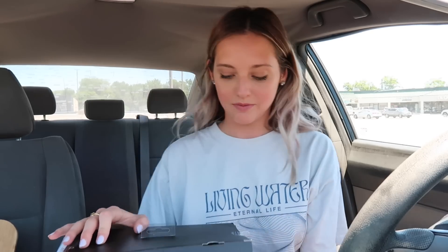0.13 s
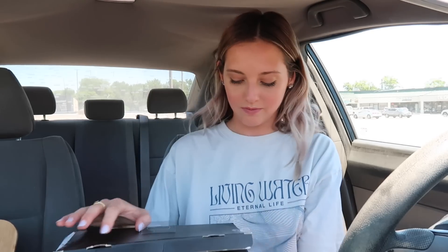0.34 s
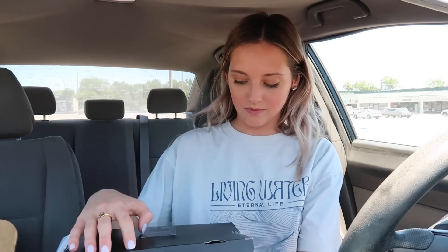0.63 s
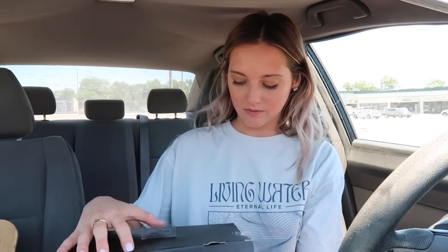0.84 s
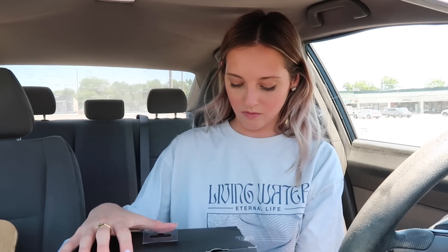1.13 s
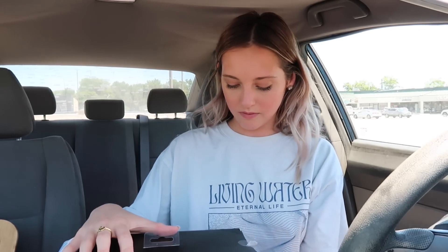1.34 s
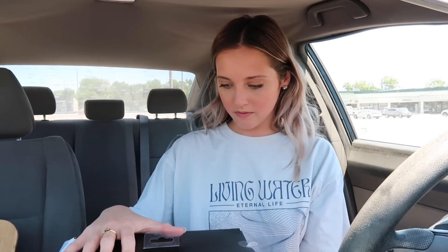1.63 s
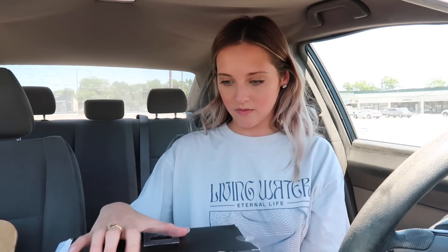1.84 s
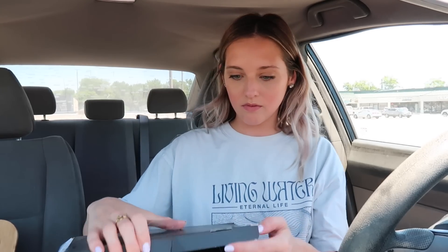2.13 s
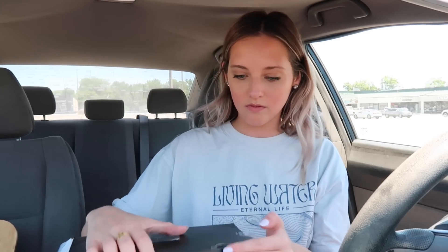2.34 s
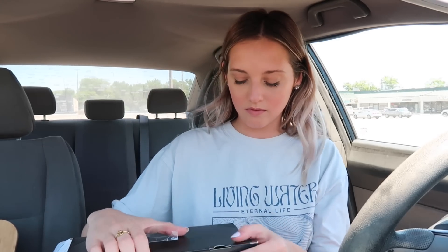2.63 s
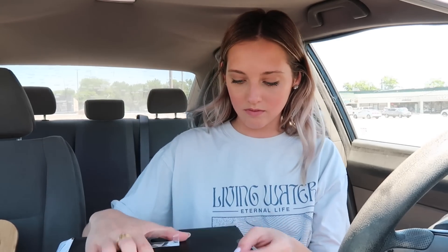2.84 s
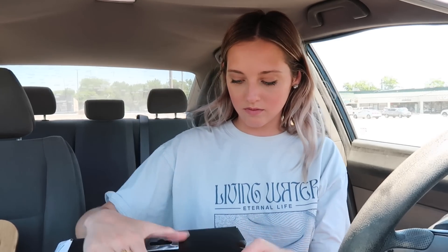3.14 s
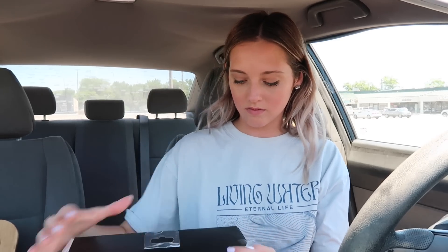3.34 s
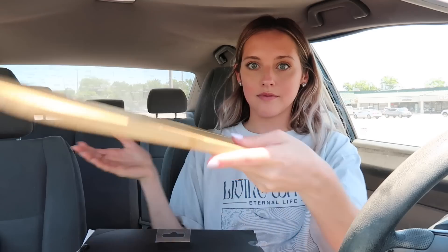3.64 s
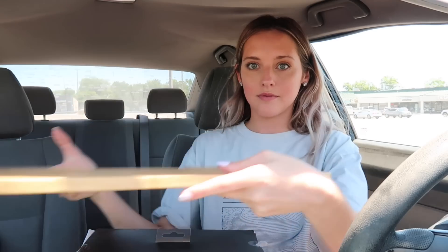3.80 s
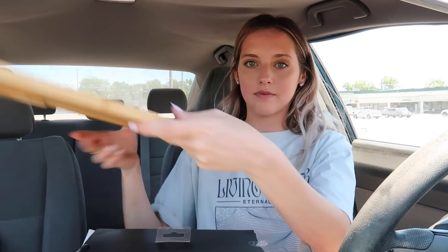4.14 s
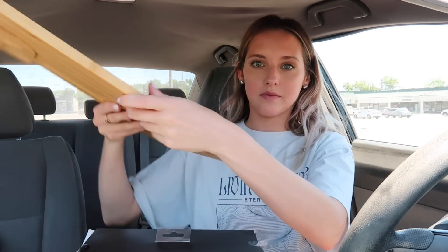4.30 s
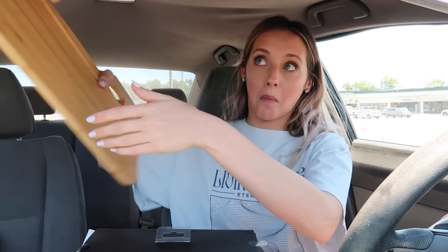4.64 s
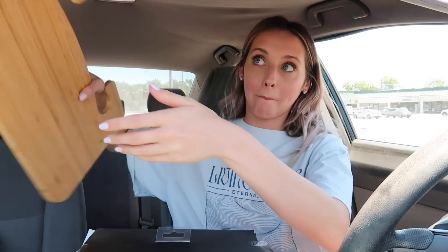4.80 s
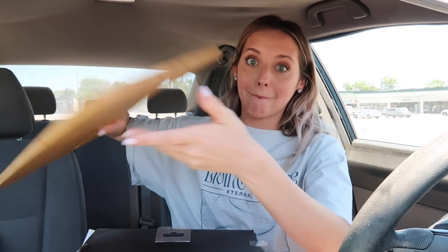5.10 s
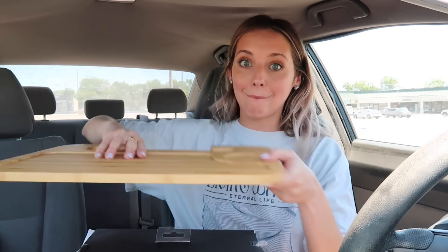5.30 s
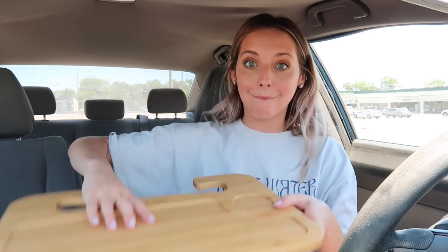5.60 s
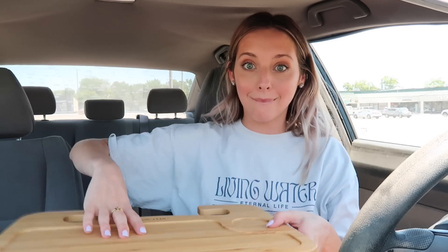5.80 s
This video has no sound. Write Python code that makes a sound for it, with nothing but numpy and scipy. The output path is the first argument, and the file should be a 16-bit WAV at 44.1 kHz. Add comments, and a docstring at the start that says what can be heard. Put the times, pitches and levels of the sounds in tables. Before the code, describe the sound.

A parked car's blower pushes steady, low-weighted air through the vents, with a soft idle hum and narrow booming resonances below 250 Hz, unchanged throughout. Fine cloth and card rustle hisses faintly on top. At about 0.8 s and again at 1.05 s, fingers tap and scuff a cardboard box in tight, dry clusters; a tiny squeak follows at 1.27 s. Softer scrapes come at 1.75 to 2.1 s. From 2.35 to 3.1 s handling is dense: gritty scuffs, nail ticks, short squeaks near 2.5 and 2.7 s, a hollow box tap at 2.87 s, a squeak at 3.08 s. Lighter scuffs occur at 3.2 to 3.5 s. Then it is mostly air, with faint brushes at 4.0 to 4.3 s and a light tick at 5.2 s. A wooden tray lands with the loudest, clustered knock at 5.68 s, and again more lightly at 5.88 s. Close, dry, nearly mono pickup.

```python
"""Handling a box and a tray in an idling car

Fingers scuff and tap a cardboard box (grainy noise bursts, blows into ringing modes) and small parts squeak.
A wooden tray knocks as it is turned and set down; cloth and card rustle as a fine treble hiss.
Behind them the blower pushes air through the vents, shaped noise that booms in narrow resonances.
A small two-port microphone: almost all is shared, the difference of the ports holds faint treble."""
import sys
import numpy as np
from scipy import signal
from scipy.fft import rfft, irfft, next_fast_len
from scipy.io import wavfile
from scipy.ndimage import uniform_filter1d

SR = 44100
rng = np.random.default_rng(int(sys.argv[2]) if len(sys.argv) > 2 else 0)


def unload_wav(signal):
    """Save mono or channel-first audio to the path in sys.argv[1] as 16-bit WAV at rate SR, clipped to [-1, 1]."""
    wavfile.write(
        sys.argv[1],
        SR,
        np.round(np.clip(np.atleast_2d(signal).T, -1, 1) * 32767).astype(np.int16),
    )


N = 262763
LEAD_S = 0.06  # room before the peak for a scuff or squeak to grow


def undb(db):
    """Decibels to an amplitude factor."""
    return 10 ** (np.asarray(db) / 20)


def unit(x):
    """Scale to an rms of 1."""
    return x / np.sqrt(np.mean(x ** 2))


def stepped(values, hold):
    """Hold each value for some samples and slew over half of that."""
    return uniform_filter1d(np.repeat(values, hold), hold // 2)


def walk(rate):
    """Random levels held 1 / rate s and slewed twice; spread near 1."""
    hold = int(SR / rate)
    steps = np.repeat(rng.standard_normal(N // hold + 1), hold)
    return 1.4 * uniform_filter1d(uniform_filter1d(steps, hold), hold)[:N]


def bin_hz(size):
    """Frequencies of the bins of a real transform."""
    return np.arange(size // 2 + 1) * SR / size


def shaped(spectrum, size):
    """Noise with the colour of (pitch_hz, level_db) points, joined over log frequency."""
    hz, db = np.transpose(spectrum)
    gain = undb(np.interp(np.log(bin_hz(size) + 1), np.log(hz), db, left=-99))
    return irfft(rfft(rng.standard_normal(size)) * gain, size)


def swell(t, rise, t60):
    """Exponential growth to a point at time zero, then an exponential fall."""
    return np.exp(np.minimum(t, 0) / rise) * undb(-60 * np.maximum(t, 0) / t60)


def add(out, s, x):
    """Mix a sound in at s seconds, cut at the end of the scene."""
    i = int(s * SR)
    out[..., i:i + x.shape[-1]] += x[..., :N - i]


# scuffs and taps of fingers, nails and edges: start_s (at the peak), level_db (shared rms at the peak),
# body_db (500 Hz re 2.8 kHz), bright_db (5.5 kHz re 2.8 kHz), t60_s
SCUFFS = [(0.783, -26.5, 3, -18, 0.09), (0.7906, -24.5, 3, -12.5, 0.051), (0.806, -26.5, 13, -20, 0.14),
          (1.035, -24, 7, -9, 0.038), (1.0445, -24, 11, -12, 0.022), (1.0572, -26.5, 3, -10.5, 0.072),
          (1.1078, -25, 18, -19, 0.08), (1.7294, -31.5, 8.5, -7.5, 0.092), (1.7537, -31, 14, -1, 0.072),
          (1.9152, -33, 2, -17, 0.16), (1.9396, -26, 4, -13, 0.063), (1.956, -26, -1, -19.5, 0.05),
          (2.089, -25, 0.5, -16, 0.073), (2.262, -38.5, -5, -1, 0.065), (2.3645, -32, -7, -5, 0.042),
          (2.371, -36, -7, -7, .08), (2.4006, -32, -5, -13, 0.1), (2.4244, -26.5, 11, -12, 0.11),
          (2.4868, -36, -6, -16, 0.12), (2.5084, -31, -3, -20, 0.092), (2.58, -41, 8, 1, .07),
          (2.6304, -34, -5, -13.5, 0.11), (2.6683, -45, 1, -20, .1), (2.6902, -33, 13, -6, 0.24),
          (2.7445, -23, 6, -9, 0.043), (2.753, -31, 10, -7, 0.1), (2.7853, -28, 2, -7, 0.068),
          (2.794, -29, 3, -10, 0.13), (2.847, -35, 10, 5, 0.07), (2.8683, -29, 0, -2, 0.02),
          (2.878, -29.5, 4, -18, 0.33), (2.9344, -30, 4, -17, 0.12), (2.9513, -22.5, 5, -16, 0.17),
          (2.9625, -23, 5.5, -1.5, 0.072), (2.9778, -28.5, 1, -15, 0.1), (3.0812, -24, 4, -16, 0.04),
          (3.094, -29, 21, 1, 0.047), (3.207, -33.5, -5, -20, 0.15), (3.3417, -32, 11, -14, 0.15),
          (3.353, -33, -2, -14, .12), (3.3635, -33, 0, -15, 0.11), (3.375, -32, -2, -13, .09),
          (3.463, -47.5, 5, 5, 0.22), (3.514, -33, 7, -10, .15), (3.5225, -30, 10, -8, 0.089),
          (3.529, -33, 13, -10, 0.087), (4.014, -40, 15, 1, 0.057), (4.1044, -30, 0.5, -18.5, 0.28),
          (4.2826, -36.5, 0, -10, 0.23), (5.2075, -32.5, -2, -3, 0.04), (5.223, -35, -4, -1, 0.075),
          (5.674, -17.5, -2, -14, 0.078), (5.6835, -21.5, 8, -14, 0.06), (5.693, -25, 3, -14, 0.11),
          (5.7714, -39, -12, -18, .08), (5.826, -41, -7, -2, 0.1), (5.875, -29, -8, -16, 0.082),
          (5.885, -29, 0, -20, 0.045), (5.896, -28, -2, -10, 0.07)]
# colour slopes in dB: 1.3 kHz re body_db; 4.3, 8, 11 and 15.5 kHz re bright_db
SCUFF_SLOPE_DB = (0.5, 5.5, -11.5, -19.5, -34.5)
# colour of the port difference: pitch_hz, level_db (relative, per Hz)
SCUFF_SIDE_TONE = [(1500, -21.5), (3500, -1), (6000, -2.5), (10000, -8.5), (14000, -9.5), (15600, -30)]
SCUFF_SIDE_DB, SCUFF_SIDE_SHARE = -10, 0.44  # port difference re shared; dB it gains per dB of brightness
SCUFF_RISE_SHARE = 0.057  # rise time re t60: short taps are also abrupt


def scuffs():
    """Gritty noise bursts swell and die in the padded cabin; bright ones split more between the ports."""
    out, size = np.zeros((2, N)), 8192
    t = np.arange(size) / SR - LEAD_S
    chest_db, bite_db, high_db, top_db, edge_db = SCUFF_SLOPE_DB
    for start_s, level_db, body_db, bright_db, t60_s in SCUFFS:
        # stick and slip: the burst is made of uneven grains about 1.5 ms long
        grain_db = 3.3 * rng.exponential(size=128).clip(0, 2.5)
        grit = stepped(undb(grain_db), 64)
        envelope = swell(t, SCUFF_RISE_SHARE * t60_s, t60_s) * unit(grit)
        tone = [(500, body_db), (1300, body_db + chest_db), (2800, 0.018),
                (4300, min(bright_db + bite_db, 0)), (5500, bright_db), (8000, bright_db + high_db),
                (11000, bright_db + top_db), (15500, bright_db + edge_db)]
        # each spot of the card favours other resonances, about 350 Hz apart
        ripple = stepped(undb(2.5 * rng.standard_normal(65)), 64)[:size // 2 + 1]
        shared = irfft(rfft(shaped(tone, size)) * ripple, size)
        side_db = SCUFF_SIDE_DB + SCUFF_SIDE_SHARE * bright_db
        burst = np.array([unit(shared), undb(side_db) * unit(shaped(SCUFF_SIDE_TONE, size))])
        add(out, start_s - LEAD_S, undb(level_db) * envelope * burst)
    return out


TILT_HZ = 1500  # a positive tilt lifts the modes above and lowers those below
FAVOUR_DB, FAVOUR_OCTAVES = 8.5, 0.21  # lift of the modes near the favoured pitch, and its reach
STRIKE_RISE_S = 0.00085  # near surfaces answer at once, so a blow builds up


def strikes(blows, modes):
    """A half-sine push into the modes of a struck thing; each blow lands elsewhere and weights them anew."""
    out, t = np.zeros(N), np.arange(6000) / SR
    hz, mode_db, t60_s = np.transpose(modes)[:, :, None]
    for start_s, drive_db, contact_s, tilt_db, favoured_hz in blows:
        spot_level, spot_pitch, spot_phase = rng.standard_normal((3, len(modes), 1))
        tilt = tilt_db * np.log2(hz / TILT_HZ)
        favour = FAVOUR_DB * np.exp(-(np.log2(hz / favoured_hz) / FAVOUR_OCTAVES) ** 2)
        weight_db = mode_db + tilt + favour + 1.4 * spot_level
        # modes detune slightly; their phases scatter more with pitch
        phase = 2 * np.pi * hz * (1 + 0.015 * spot_pitch) * t + spot_phase * hz / 1200
        ring = (undb(weight_db - 60 * t / t60_s) * np.sin(phase)).sum(axis=0)
        ring = ring * (1 - np.exp(-t / STRIKE_RISE_S))
        push = np.sin(np.pi * np.clip(t[:400] / contact_s, 0, 1))
        add(out, start_s, undb(drive_db) * np.convolve(ring, push / push.sum()))
    return out


# nails and edges tapping the box: start_s, drive_db, contact_s, tilt_db (per octave), favoured_hz
TAPS = [(0.782, -33, 0.00013, -6, 2700), (0.791, -35, .0001, -2, 4200), (0.7945, -30, 0.00017, -9, 1990),
        (0.801, -34, .0001, -3, 2900), (0.806, -26, .00015, -2, 1600), (1.033, -27, .0001, -1.5, 4300),
        (1.0335, -27, 0.00014, -4, 1200), (1.0365, -26, .00014, 0, 2300), (1.043, -26, .0001, -1.5, 4100),
        (1.0478, -34, 0.0001, -2, 3300), (1.0555, -29, 0.00011, -3.5, 4080), (1.0605, -39, .0001, -2, 3200),
        (2.4005, -32, 0.00012, 1.5, 2750), (2.411, -30, 0.00012, 3, 2900), (2.419, -42, .0001, 2, 2300),
        (2.43, -33, .0001, 1, 3300), (2.667, -38, 0.0001, 4, 4600), (2.7435, -29, .0001, 0.5, 4700),
        (2.8662, -29, .0001, 2, 2690), (2.87, -22.5, 0.00044, -6, 800), (2.874, -31, .0001, 2, 2620),
        (2.8755, -20, 0.00063, -2, 724), (2.9405, -25, 0.00016, -6, 1010), (2.944, -37, 0.000092, 8, 2050),
        (2.949, -35, .0001, 1, 2900), (2.954, -29, .0001, 2, 2750), (2.958, -34, .0001, -1, 1600),
        (2.9625, -33, 0.00012, 3, 2950), (2.963, -26.5, 0.00012, 5.5, 5600),
        (2.965, -27.5, 0.000088, 6, 5100), (2.9685, -29, 0.000089, -4, 4660),
        (2.972, -30, 0.000092, 2, 1800), (2.976, -33, 0.000092, 6, 4730), (2.981, -37, 0.00012, 3, 3230),
        (2.986, -36, .0001, 5.5, 2300), (3.057, -33, .0001, 2.5, 3020), (3.0805, -30, .0001, -2, 3300),
        (3.209, -35, .0001, 1, 2000), (3.354, -33.5, .0001, 1, 2700), (3.363, -34, .0001, 2, 4000),
        (3.3745, -36, .0001, 2, 2900), (3.522, -36, .0001, 2, 3500)]
# what the box rings with: pitch_hz, level_db (before tilt and favour), t60_s
BOX = [(610, -12, 0.024), (700, -6, 0.025), (780, -0.5, 0.038), (903, -15, 0.025), (1144, -1, 0.024),
       (1620, -19, 0.023), (1985, -1.5, 0.039), (2320, -8, 0.028), (2670, -4.5, 0.053), (2910, -3, 0.036),
       (3350, -5, 0.031), (3790, -7.5, 0.022), (4320, -7, .02), (4700, -8, 0.018), (5170, -9, 0.027),
       (5580, -9, .025)]


def box_taps():
    """Brief contacts excite the short-lived modes of the cardboard box."""
    return strikes(TAPS, BOX)


# blows that make the tray's board ring: start_s, drive_db, contact_s, tilt_db (per octave), favoured_hz
KNOCKS = [(4.105, -36, .0001, 4, 3200), (4.112, -39, .0001, 4, 3200), (5.2065, -36, 0.0001, 1, 2250),
          (5.2075, -35, .0001, 5, 3500), (5.211, -36, .0001, 6, 4300), (5.221, -34, 0.000092, 6, 3750),
          (5.2235, -35, 0.00012, 4, 2700), (5.226, -32, .0001, 5, 3750), (5.668, -21.5, 0.00025, 3.5, 302),
          (5.671, -26, 0.00087, 0.5, 202), (5.6735, -13, 0.0003, 4.5, 1030), (5.676, -30, .0002, -1, 3500),
          (5.679, -28, 0.00027, 11, 2500), (5.682, -26, 0.00011, 2.5, 3200),
          (5.683, -13.5, 0.00024, 3.5, 520), (5.689, -31, .0004, 8, 700), (5.693, -27, 0.00034, 7, 2100),
          (5.696, -31, 0.00036, 1, 895), (5.7015, -25, 0.0019, 1, 317), (5.874, -31, .0002, 5, 2500),
          (5.877, -22, 0.00024, 8.5, 2200), (5.879, -28, 0.00079, 1.5, 264),
          (5.8808, -23.5, 0.0002, 6, 2700), (5.8828, -14.5, 0.00053, 2, 422),
          (5.8825, -19, 0.00036, 5, 990), (5.884, -28, 0.00016, 4, 3700), (5.8875, -26, 0.00032, 6, 800),
          (5.889, -30, 0.00022, 6, 2200), (5.8925, -25, 0.00068, 3.5, 354)]
# what the board rings with: pitch_hz, level_db (before tilt and favour), t60_s
BOARD = [(187, 14, 0.053), (264, 4, 0.081), (347, 11, 0.038), (478, 5, 0.016), (650, 1.5, 0.035),
         (860, -1.5, 0.06), (1060, 0.5, 0.02), (1297, -11, 0.095), (2090, -13, 0.066), (2210, -4.5, 0.038),
         (2705, -0.5, 0.025), (3230, -7, .03), (3730, -5.5, 0.027), (4500, -11, 0.035), (6020, -17, .04)]


def tray_knocks():
    """Clustered blows excite the modes of the wooden board, which reach lower than those of the box."""
    return strikes(KNOCKS, BOARD)


# short squeaks of small parts: start_s (at the peak), level_db (peak, before stutter), pitch_hz, rise_s,
# t60_s, glide_hz_per_s (after the peak)
SQUEAKS = [(1.266, -32, 2445, 0.0074, .12, 0), (1.756, -39, 4300, .002, 0.055, 0),
           (2.468, -28, 1280, 0.012, 0.087, 0), (2.503, -27, 1273, 0.011, 0.13, -500),
           (2.669, -33, 2800, .003, .09, 12000), (2.673, -31.5, 3400, 0.0044, 0.26, -38000),
           (2.694, -31, 3050, 0.0065, 0.094, 1000), (2.787, -41, 6000, .002, 0.048, 40000),
           (3.082, -25, 2170, .002, 0.047, 0)]
SQUEAK_GRAIN_DB = 3  # spread of the stutter, before slewing
SQUEAK_WAVER = 0.1  # pitch noise as a share of the pitch, before smoothing to a tenth of that
GLIDE_S = 0.017  # how long a squeak slides in pitch


def squeaks():
    """Damped tones whose pitch wavers and whose level stutters."""
    out, t = np.zeros(N), np.arange(8192) / SR - LEAD_S
    for start_s, level_db, pitch_hz, rise_s, t60_s, glide_hz_per_s in SQUEAKS:
        stutter_db = SQUEAK_GRAIN_DB * stepped(rng.standard_normal(64), 128)
        waver = SQUEAK_WAVER * uniform_filter1d(rng.standard_normal(len(t)), 100)
        pitch = (pitch_hz + glide_hz_per_s * np.clip(t, 0, GLIDE_S)) * (1 + waver)
        tone = np.sin(2 * np.pi * np.cumsum(pitch) / SR)
        add(out, start_s - LEAD_S, undb(level_db + stutter_db) * swell(t, rise_s, t60_s) * tone)
    return out


# level of the treble rustle in the port difference: start_s, level_db (rms, before swell and grain)
RUSTLE = [(0.0, -48), (0.2, -63), (0.33, -54.5), (0.5, -62), (0.8, -55), (1.1, -64.5), (1.4, -57.5),
          (2.0, -59), (2.3, -56.5), (2.9, -59), (3.3, -53.5), (3.5, -61), (3.75, -66), (4.0, -56.5),
          (4.5, -63), (5.3, -59), (5.55, -62), (5.7, -52), (5.96, -63)]
# colour of the shared part: pitch_hz, level_db (relative, per Hz)
RUSTLE_SHARED = [(1500, -9), (3000, 5), (5500, -2), (8200, -10.5), (8800, -14), (15000, -61)]
# colour of the port difference: pitch_hz, level_db (relative, per Hz)
RUSTLE_TONE = [(4000, -11), (7000, 7.5), (9000, 4.5), (13000, 0.5), (14500, -5), (15200, -10),
               (15600, -20.5)]
RUSTLE_SWELL_DB, RUSTLE_GRAIN_DB = 1.01, 2.4  # slow and fast wander of the level


def rustle():
    """Fine treble hiss of cloth, card and air, slightly grainy; shared part and port difference."""
    size = next_fast_len(N)
    shared = undb(3.5) * unit(shaped(RUSTLE_SHARED, size))
    side = unit(shaped(RUSTLE_TONE, size))
    start_s, level_db = np.transpose(RUSTLE)
    motion_db = np.interp(np.arange(N) / SR, start_s, level_db)
    grainy_db = motion_db + RUSTLE_SWELL_DB * walk(5.3) + RUSTLE_GRAIN_DB * walk(37)
    return undb(grainy_db) * np.array([shared, side])[:, :N]


def flicker(x, db):
    """Each octave flutters on its own, as eddies come and go."""
    size = next_fast_len(N)
    bins, octave = rfft(x, size), np.log2(bin_hz(size) + 1)
    out = np.zeros(N)
    for k in range(16):
        band = irfft(bins * np.clip(1 - abs(octave - k), 0, 1), size)[:N]
        out += undb(db * walk(9)) * band
    return out


def resonance(hz, width, size):
    """Noise through a resonance applied twice, so that its skirts fall steeply."""
    f = bin_hz(size) + 1e-3  # keeps clear of division by zero
    response = 1 / (1 + ((f - hz ** 2 / f) / width) ** 2)
    return unit(irfft(rfft(rng.standard_normal(size)) * response, size)[:N])


# rushing air shared by both ports: pitch_hz, level_db (relative, per Hz)
AIR = [(15, -29.5), (26, -16.5), (33, -8), (62, -6), (80, -4.5), (145, -4.5), (286, -9.5), (325, -8),
       (413, -13), (470, -10.5), (664, -18.5), (790, -16), (1360, -22), (1510, -25.5), (2650, -28),
       (3050, -33.5), (3500, -36.5), (4200, -42), (5200, -46.5), (6300, -53), (8200, -61), (8700, -89),
       (16000, -105)]
# port difference of the air, on the same scale: pitch_hz, level_db (relative, per Hz)
AIR_SIDE = [(40, -63.5), (65, -54.5), (108, -51), (200, -42), (260, -39), (380, -35), (900, -39.5),
            (1100, -43.5), (2000, -47.5), (2600, -48.5), (3300, -44), (5800, -48), (7500, -59),
            (13000, -61.5), (15600, -71.5)]
# resonances that the air and the engine keep ringing: pitch_hz, width_hz, level_db (rms, before flicker)
BOOM = [(45, 9.8, -33.5), (121.8, 9.9, -36.5), (179, 41, -31.5), (193.8, 41, -26.5), (238.4, 26, -38)]
AIR_DB = -22  # rms of the shared air before boom and flicker
BLOW_DRIFT_DB = 0.05  # slow wander of the blower level


def blower():
    """Air rush with cabin and idle resonances; returns shared part and port difference."""
    size = next_fast_len(N)
    mid, side = shaped(AIR, size)[:N], shaped(AIR_SIDE, size)[:N]
    scale = undb(AIR_DB) / np.sqrt(np.mean(mid ** 2))
    mid = scale * mid
    for pitch_hz, width_hz, level_db in BOOM:
        mid = mid + undb(level_db) * resonance(pitch_hz, width_hz, size)
    return np.array([flicker(mid, db=0.78), scale * side]) * undb(BLOW_DRIFT_DB * walk(1.33))


def scene():
    """Sum the shared part and the port difference of all layers, then form the two ports."""
    mid, side = scuffs() + rustle() + blower()
    mid = mid + box_taps() + tray_knocks() + squeaks()
    return np.array([mid + side, mid - side])


def record(dry):
    """Soft saturation rounds the loudest peaks and a steep elliptic low-pass cuts the top."""
    soft = 0.9 * np.tanh(dry / 0.9)
    top_cut = signal.ellip(10, 0.2, 70, 15650, fs=SR, output="sos")  # order, ripple dB, stop dB, edge Hz
    return signal.sosfilt(top_cut, soft)


dry = scene()
out = record(dry)
unload_wav(out)
```